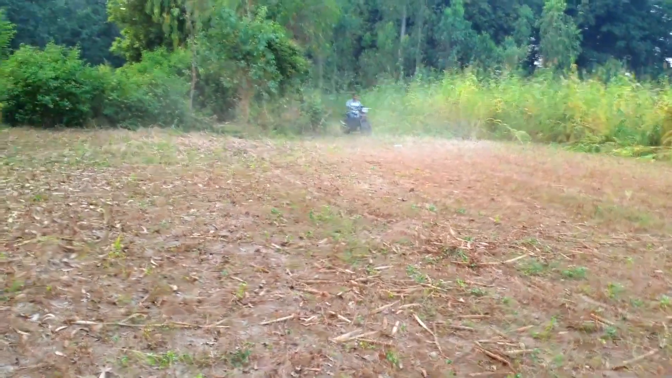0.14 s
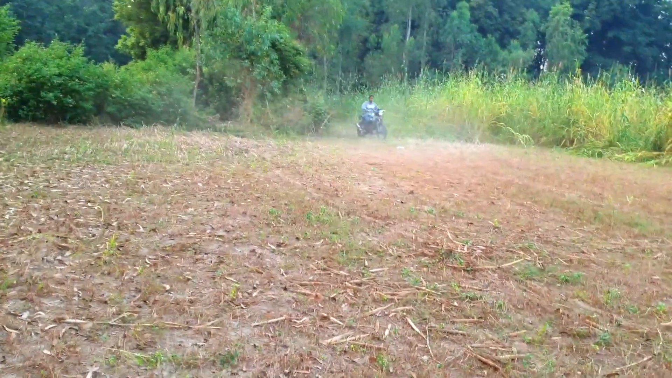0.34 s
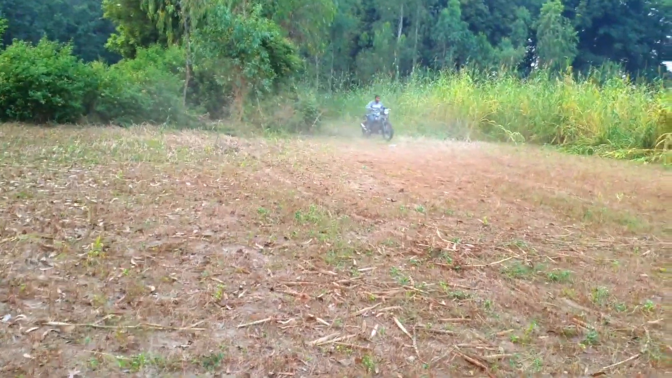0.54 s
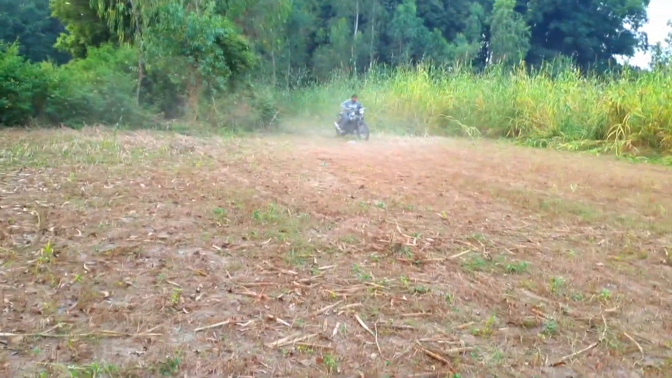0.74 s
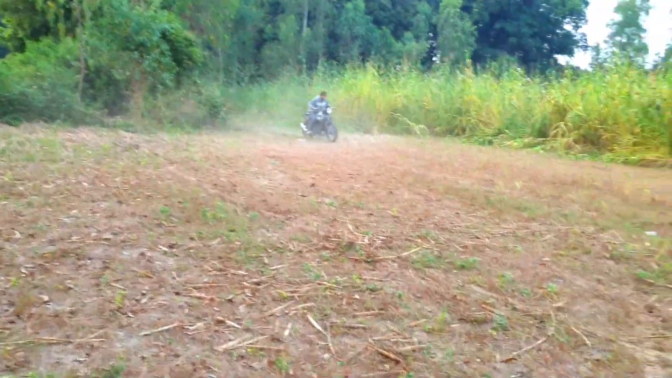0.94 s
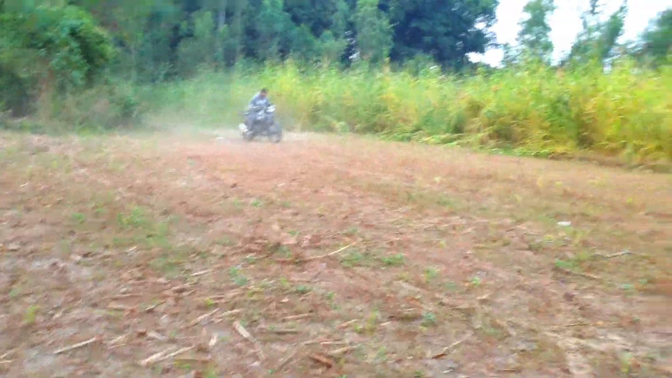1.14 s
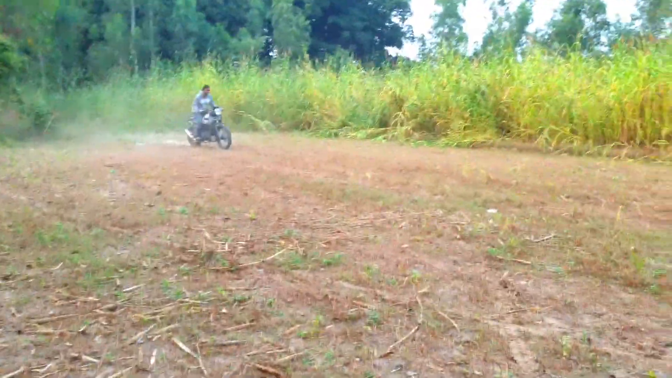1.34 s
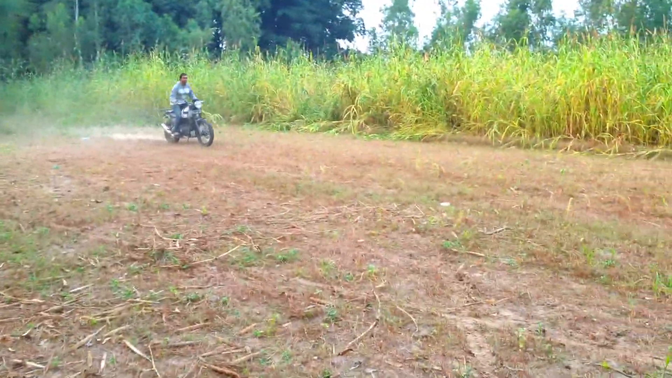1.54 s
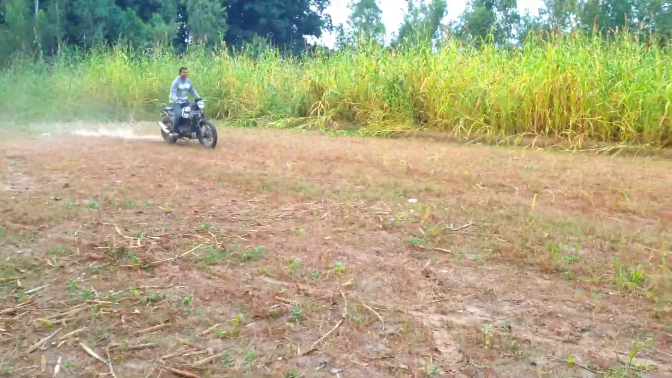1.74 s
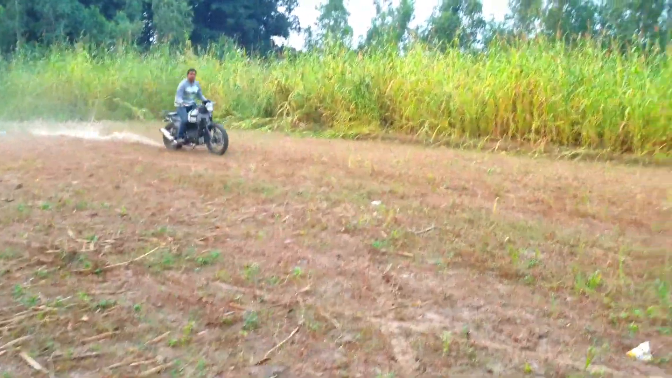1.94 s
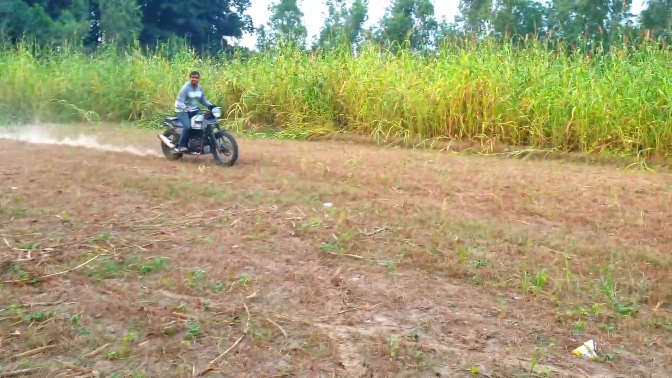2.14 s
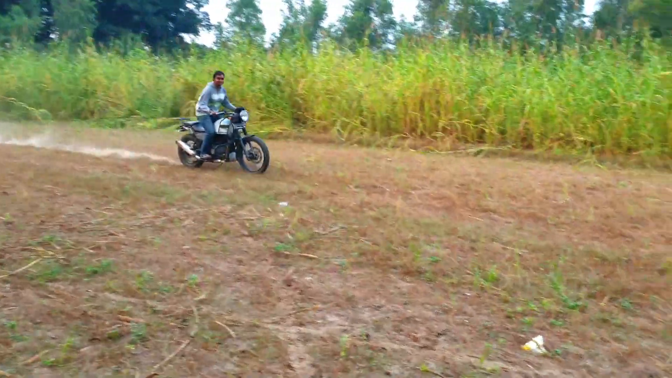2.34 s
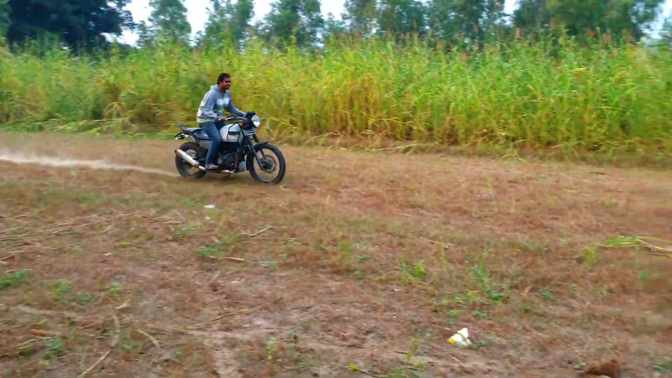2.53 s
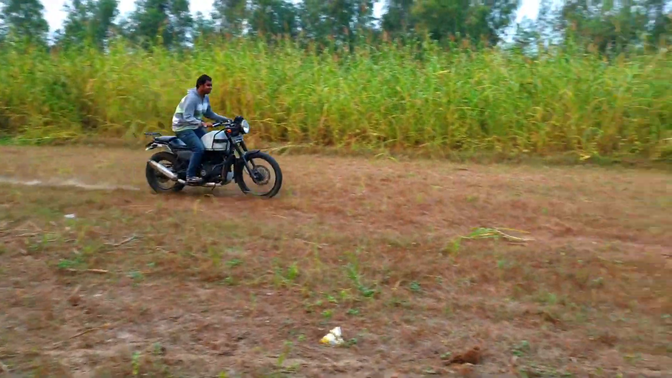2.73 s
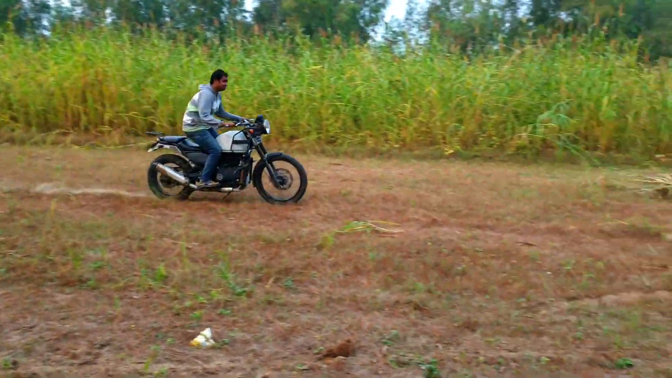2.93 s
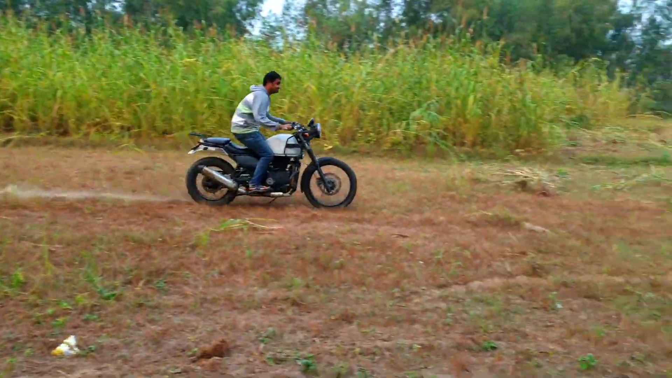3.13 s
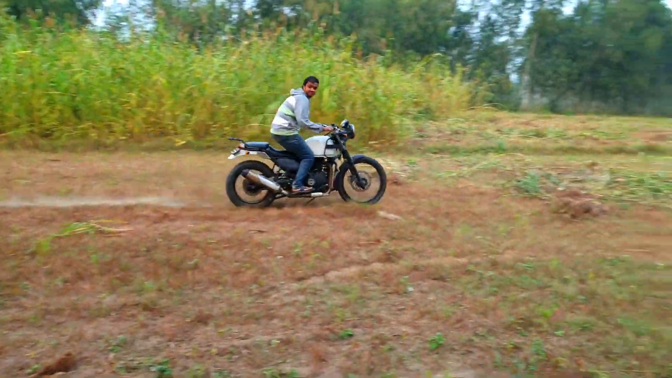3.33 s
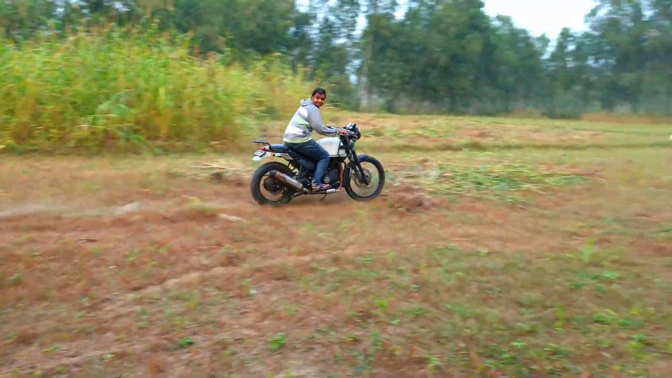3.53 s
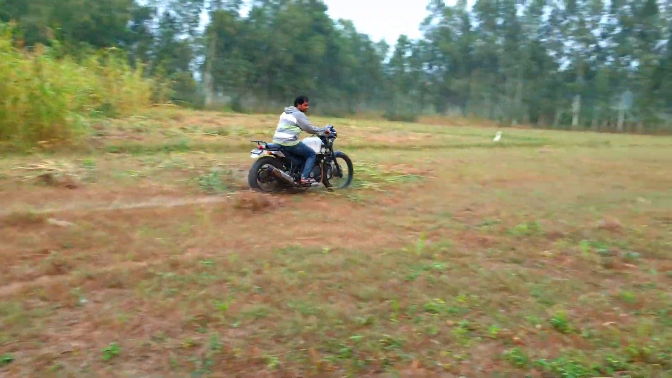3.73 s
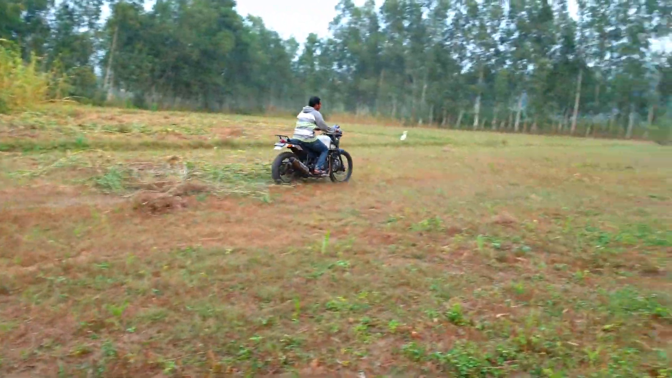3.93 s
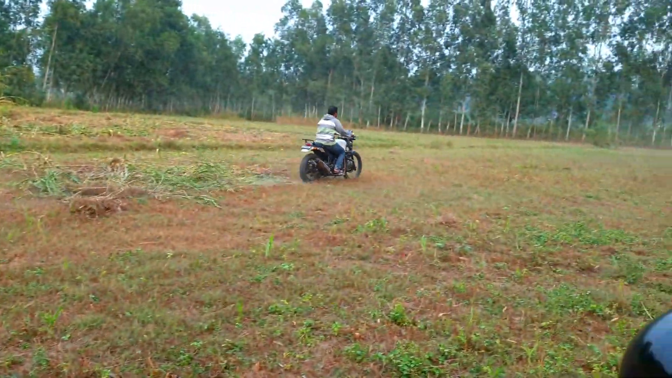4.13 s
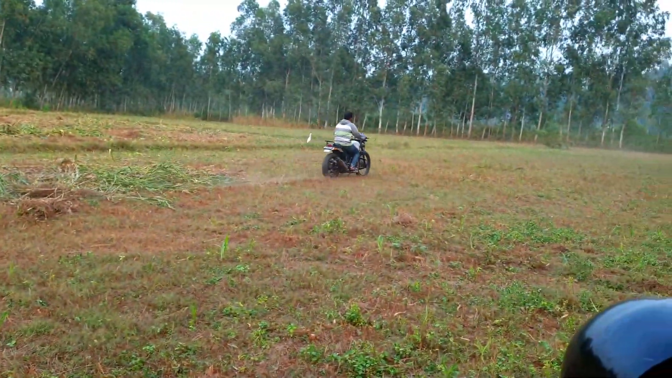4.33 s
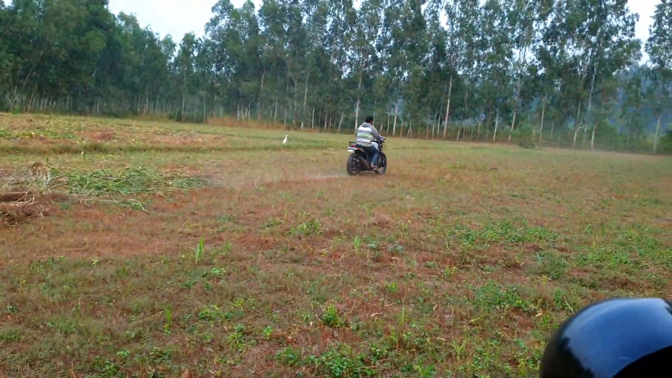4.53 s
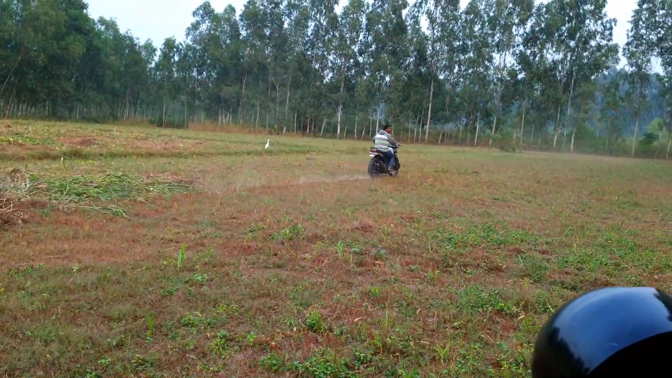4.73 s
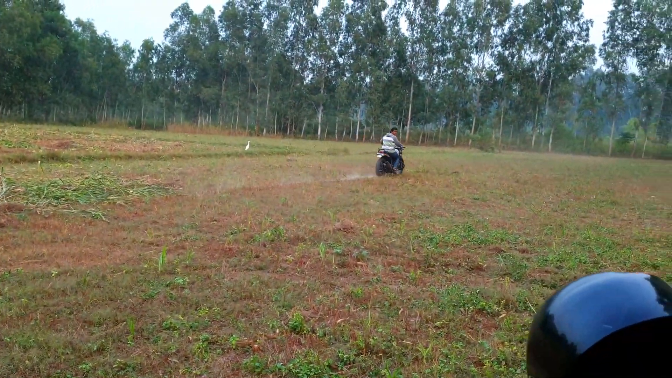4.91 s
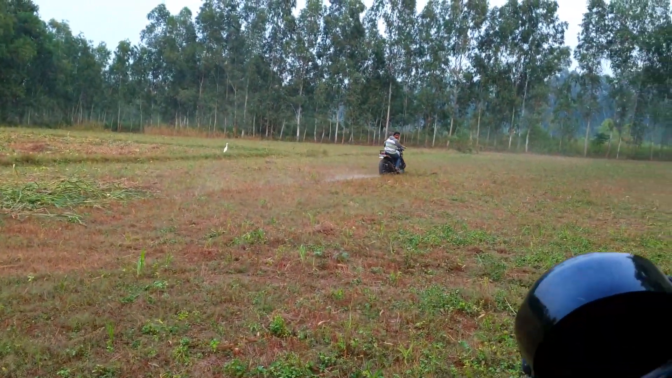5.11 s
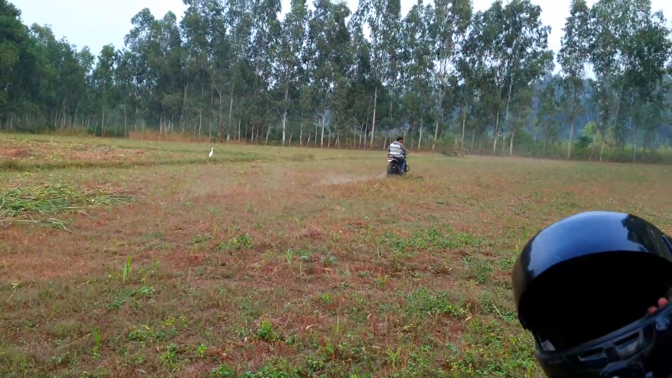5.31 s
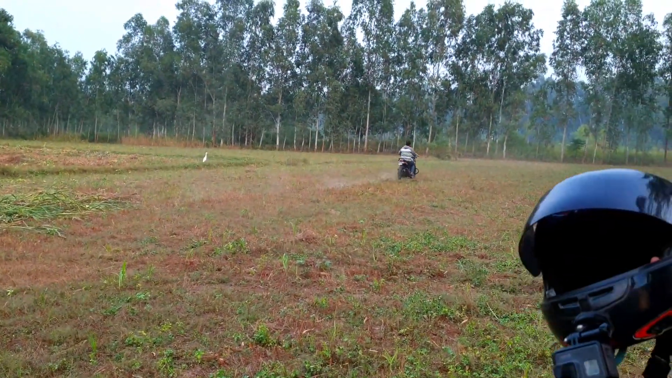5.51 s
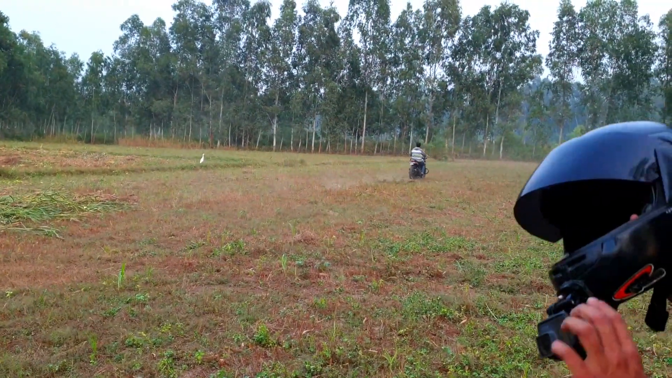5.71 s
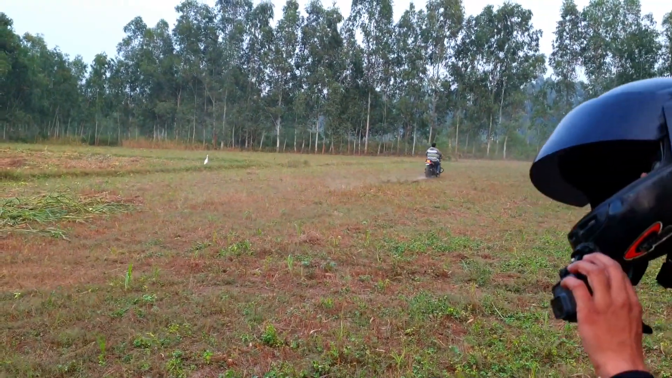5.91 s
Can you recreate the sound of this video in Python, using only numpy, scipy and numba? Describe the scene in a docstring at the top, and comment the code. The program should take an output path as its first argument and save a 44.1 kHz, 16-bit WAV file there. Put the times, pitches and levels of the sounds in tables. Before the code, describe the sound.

In an open dry field, a single-cylinder motorcycle starts far off at a slow, quiet thump, then accelerates towards the microphone with rising pitch, clattering valves and crackling stubble. It passes about seven metres away in a growling exhaust bark, the throttle closes with a brief burble, and it recedes, slowing, with loose metallic chinks and one sharp pop. Handheld stereo microphone, lopsided until the pass, then centred.

```python
"""First a motorcycle idles to the fore; it pulls away over a dry field, passes about 7 m off and eases away.
Each firing of its single four-stroke cylinder rings the silencer and puffs gas; the intake gulps and honks.
Random knocks at repeating crank angles make the valve clatter; random cracks make the stubble under the tyres.
Close to the pass the two-port stereo image snaps from lopsided (bass right, hiss left) to centred.
A pop, loose metal and jolts from the ground stand out over rolling rumble and faint open air."""
import sys
import numpy as np
from scipy import signal
from scipy.fft import rfft, irfft, next_fast_len
from scipy.io import wavfile
from scipy.ndimage import uniform_filter1d, map_coordinates
from numba import njit

SR = 44100
rng = np.random.default_rng(int(sys.argv[2]) if len(sys.argv) > 2 else 0)


def generate_wav(sig):
    """Save sig (samples, or channels by samples) to the path in sys.argv[1] as 16-bit PCM at SR."""
    pcm = np.round(np.clip(np.atleast_2d(sig).T, -1, 1) * 32767).astype(np.int16)
    wavfile.write(sys.argv[1], SR, pcm)


N = 267141
TIME = np.arange(N) / SR

# two weak firings, a brief burble as the throttle eases: (time [s], level [dB])
WEAK_FIRINGS = [(3.724, -6), (3.76, -8)]
# pipe resonances at 45 firings per second: (centre [Hz], width [Hz], level [dB])
TAILPIPE_MODES = [(217, 1400, -2), (265, 96, 5.5), (319.4, 9.9, 4), (372.5, 58, 1.5)]
# growl of the tailpipe's mouth as it points at the listener: (time [s], level [dB])
GROWL_LEVEL = [(2.7, -66), (3.05, -40), (3.2, -20), (3.42, -22.5), (3.64, -36), (3.8, -70), (4.2, -80)]
# air box, then intake duct: (centre [Hz], width [Hz])
INTAKE_MODES = [(46, 13.6), (156, 370)]
# the rider's hand: (time [s], throttle opening [0-1])
THROTTLE_OPENING = [(0, .62), (.4, 0.41), (.55, 0.65), (.68, 0.89), (.8, 0.79), (1.17, 1), (1.55, 0.98),
                    (2.1, 0.86), (2.3, 1), (3.63, 0.93), (3.8, 0.62)]


def exhaust_note(cycle, rate_hz, rear, boom_db, bark_db, gulp_db):
    """Each blowdown rings the silencer; a third of a cycle later the intake sucks on the air box."""
    fired = np.interp(np.arange(1, int(cycle[-1]) + 1), cycle, TIME) - .00333
    size_chance, time_chance = rng.standard_normal((len(fired), 2)).T
    size_db = .5 * size_chance + sum(db * (abs(fired - s) < .01) for s, db in WEAK_FIRINGS)
    pulses = clicks(fired + .00005 * time_chance, undb(size_db))

    # the boom sits a little lower the faster the engine runs
    boom = swept(pulses, 115.2 * (45 / rate_hz) ** 0.18, 20.0)
    # faster running heats the gas, which raises the pipe's resonances
    heat = (rate_hz / 45) ** 0.24
    bark = sum(undb(db) * swept(pulses, hz * heat, float(width)) for hz, width, db in TAILPIPE_MODES)
    bark = lowpass(resonance(bark, hz=323, width_hz=1030), hz=435, order=6)

    # one long-ringing resonance takes over a little from the broad bark
    growl_gain = undb(curves(GROWL_LEVEL)[0])
    growl = steady(resonance(bark, hz=317.6, width_hz=40)) * growl_gain
    bark = steady(colour(bark, [(290, 2.0), (365, 1.0), (440, -10), (520, 13.5)]))
    bark = bark * (1 - 0.13 * growl_gain / growl_gain.max())

    # the suction follows at a fixed crank angle plus its travel through the duct
    suction = -window(cycle - 0.0011 * rate_hz, centre=0.33, width=0.038)
    # slow cycles leave the small duct time to ring; at speed the big air box takes over
    (box_hz, box_width), (duct_hz, duct_width) = INTAKE_MODES
    duct_gain = (30 / rate_hz) ** 2 * undb(-19.5)
    gulp = resonance(suction, box_hz, box_width) + duct_gain * resonance(suction, duct_hz, duct_width)

    # the intake valve opens with a jolt once a cycle, and the snorkel honks forwards
    opened = np.interp(np.arange(int(cycle[-1])) + 0.102, cycle, TIME)
    honk = clicks(opened, np.ones(len(opened)))
    for _ in range(2):
        honk = resonance(honk, hz=419, width_hz=92)
    honk_gain = undb(gulp_db - 12) * (1 - rear) * curves(THROTTLE_OPENING)[0] ** 2

    note = steady(boom) * undb(boom_db) + bark * undb(bark_db + 1.0) + steady(gulp) * undb(gulp_db + 1.5)
    note = note + growl + steady(honk) * honk_gain
    # small openings radiate little deep bass, and the packing absorbs the top
    return colour(note, [(22, -38), (45, -18.0), (65, 1.5), (400, -2), (500, -20.0), (900, -16)])


# colours of the noisy parts, each: (frequency [Hz], gain [dB])
RASP_COLOUR = [(15, -36), (35, -4), (150, -2), (300, 4), (490, -6), (620, -3), (820, -1), (1020, -1.5),
               (1400, 2), (1700, 0.5), (2100, -27), (4000, -27)]
# engine case
CASE_COLOUR = [(1200, -41), (1780, 5), (1930, 11), (2020, 7), (2150, 12.5), (2300, 8), (2480, 8),
               (2650, 10), (2790, 10.5), (2950, 8.5), (3300, -2), (3900, -1.5), (5000, -22)]
# metal clatter
CLATTER_COLOUR = [(2200, -65), (3300, 3.5), (4100, 2), (4800, 2), (5800, 1.5), (6800, 4.5), (7500, -2.5),
                  (8100, -11.5), (11000, -61)]
# valve ticks
TICK_COLOUR = [(6000, -69), (8000, 5), (9100, 11), (10800, 4.5), (12000, 1), (13200, -14), (16000, -23.5)]
# gas hissing through the tailpipe
PUFF_COLOUR = [(200, -44), (600, -17.5), (1500, -13.5), (1820, -9), (2020, -10.5), (2230, 0), (2480, -0.5),
               (2750, -7.5), (3300, -14), (4000, -10), (4950, -13), (5700, -10), (6400, -17), (9000, -52)]


def engine_noise(cycle, rear, rasp_db, ring_db, clatter_db, tick_db):
    """Metal clatter dominates from the front, puffs of exhaust gas from behind."""
    gas = rng.standard_normal((5, N))
    # no two blowdowns or valve closings are equally strong
    force_per_cycle = undb(2 * rng.standard_normal((int(cycle[-1]) + 2, 2)))
    blow_force, valve_force = force_per_cycle[(cycle + .5).astype(int)].T
    blowdown = blow_force * window(cycle, centre=-0.078, width=0.029)
    outflow = window(cycle, centre=0.08, width=0.26)
    valves = valve_force * window(cycle, centre=-0.21, width=0.038)
    front = np.sqrt(np.clip(1 - rear ** 2, .01, 1))

    rasp = 0.96 * valve_gear(cycle, count=40, scatter_db=2.5, slop_s=.00003)
    rasp = rasp + gas[0] * (0.5 + rear * (blowdown + 0.38 * outflow))
    case = 0.92 * valve_gear(cycle, count=48, scatter_db=3.0, slop_s=.000015)
    case = case + gas[1] * (1.1 + 0.18 * rear * blowdown)
    clatter = 1.9 * valve_gear(cycle, count=90, scatter_db=3.0, slop_s=.000015)
    clatter = clatter + gas[2] * (1.65 + 0.21 * outflow + rear * (blowdown + .5 * outflow))

    # the metal is loudest as the exhaust valve opens and while the gas flows, and rests during the intake
    load = 1 + 0.4 * valves + 0.4 * outflow
    case, clatter = case * load, clatter * load
    # the valves stand out only from the front
    valve_share = 4.1 * np.clip(1 - 4.0 * rear, 0, 1)
    tick = gas[3] * (1 + valve_share * valves + .5 * outflow + 2.4 * rear * blowdown)

    # gas hisses through the tailpipe, and each blowdown strikes its metal with a short chink
    flow = gas[4] + 1.2 * valve_gear(cycle, count=120, scatter_db=2.0, slop_s=.00001)
    jet = flow * (1 + blowdown + 0.058 * outflow)
    jet = steady(colour(spread(jet, width=0.088), PUFF_COLOUR))
    chink = shell_ring(cycle, scatter_db=4.5, buzz=0.014)

    rasp = steady(colour(spread(rasp, width=0.61), RASP_COLOUR))
    case = steady(colour(spread(case, width=0.45), CASE_COLOUR))
    clatter = steady(colour(spread(clatter, width=1.0), CLATTER_COLOUR))
    tick = steady(colour(spread(tick, width=16.0), TICK_COLOUR))
    return (rasp * undb(rasp_db + 1.73)
            + case * undb(ring_db + 1.45) * front
            + (jet * undb(1.5) + chink * undb(-3.5)) * undb(ring_db) * rear
            + clatter * undb(clatter_db - 3.0) * np.sqrt(front)
            + tick * undb(tick_db - 1.0))


def valve_gear(cycle, count, scatter_db, slop_s):
    """Knocks near the same crank angles in every cycle; strengths drift over a few cycles and scatter in each."""
    angles = (np.arange(count) + rng.random(count)) / count
    turns = np.arange(int(cycle[-1]) + 1)[:, None] + angles
    times = np.interp(turns, cycle, TIME) + slop_s * rng.standard_normal(turns.shape)
    drift = np.tanh(4 * uniform_filter1d(rng.standard_normal(turns.shape), size=13, axis=0))
    return steady(clicks(times, drift * undb(scatter_db * rng.standard_normal(turns.shape))))


# ringing of the silencer's metal shell: (centre [Hz], width [Hz], level [dB])
SHELL_MODES = [(1590, 11, 7), (1890, 14, 18), (2240, 89, 11), (2450, 82, -11), (4790, 88, -1),
               (5940, 95, 4.5), (6560, 250, -16)]


def shell_ring(cycle, scatter_db, buzz):
    """Each blowdown strikes the silencer's shell once; gas noise keeps it buzzing faintly."""
    turns = np.arange(1, int(cycle[-1]) + 1)
    size_chance, time_chance = rng.standard_normal((len(turns), 2)).T
    struck = np.interp(turns - 0.12, cycle, TIME) + 0.000175 * time_chance
    blows = clicks(struck, undb(scatter_db * size_chance))
    gas = rng.standard_normal((2, N)) * buzz * (0.74 + window(cycle, centre=-0.032, width=0.1))
    drive = blows + gas
    return steady(sum(undb(db) * resonance(drive, hz, width) for hz, width, db in SHELL_MODES))


# colour of the pop's crack: (frequency [Hz], gain [dB])
CRACK_COLOUR = [(300, -12), (700, -7), (1000, -21), (1350, -2), (1900, -1), (2200, -5), (3600, -4),
                (4200, -24), (8000, -24), (14000, -40)]
POP_S, POP_THUMP_S, POP_THUMP_DB, POP_CRACK_DB = 5.465, 0.0014, -17, -15


def pop():
    """Unburnt fuel goes off in the pipe: one short pressure swing with a sharp crack on it."""
    age = (TIME - POP_S - 0.0011) / POP_THUMP_S
    thump = (age ** 2 - 1) * np.exp(-.5 * age ** 2)
    after_s = np.maximum(TIME - POP_S, 0)
    spit = 0.16 * rng.standard_normal(N) * (after_s > 0) * np.exp(-after_s / 0.0025)
    crack = colour(clicks([POP_S], [1]) + spit, CRACK_COLOUR)
    return thump * undb(POP_THUMP_DB) + crack / abs(crack).max() * undb(POP_CRACK_DB)


# rough ground and a brief metallic ring:
# (time [s], peak level [dB], centre [Hz], width of each resonance pass [Hz], decay [s])
GROUND_KNOCKS = [(0.168, -27, 6860, 7990, 0.00083), (2.78, -14, 5500, 7000, 0.0018),
                 (2.785, -16, 780, 646, 0.0092), (2.964, -18.5, 2836, 67, 0.095),
                 (4.172, -26, 591.5, 390, 0.0094)]
# loose metal chinking on the silencer: (time [s], relative level [dB])
LOOSE_METAL = [(4.5915, -22), (4.6865, -28), (4.711, -27), (4.736, -34), (4.76, -24), (4.8084, -25),
               (4.8318, -26), (4.9045, -26), (4.9296, -27), (4.9536, -26), (5.0522, -28), (5.0776, -31),
               (5.1275, -24), (5.153, -25), (5.2298, -25), (5.3061, -22), (5.3837, -27), (5.4358, -34),
               (5.57, -25), (5.5974, -29), (5.6513, -29), (5.792, -34), (5.9631, -30), (6.023, -33)]
# valve ticks that stand out on the approach: (time [s], relative level [dB], ring [Hz])
STRONG_TICKS = [(0.8896, -26, 9860), (1.371, -24, 9010), (1.4938, -15, 10200), (1.5177, -16, 8700),
                (1.5412, -17, 8930), (1.6555, -18, 9170), (1.6988, -16, 9280), (1.7866, -21, 9030),
                (1.832, -17, 8870), (1.8971, -15, 9140), (1.9388, -17, 10200), (1.9597, -19, 9210),
                (1.9822, -18, 10300), (2.0026, -22, 9170), (2.1119, -17, 9260), (2.1338, -18, 10200)]


def knocks():
    """Jolts from the ground, the loose metal and the loudest valve ticks, each a ringing puff of noise."""
    jolts = sum(burst(*row) for row in GROUND_KNOCKS)
    chinks = sum(burst(s, db, hz=2380, width_hz=480, decay_s=0.0004) for s, db in LOOSE_METAL)
    ticks = sum(burst(s, db, hz, width_hz=3000, decay_s=0.0006) for s, db, hz in STRONG_TICKS)
    return jolts + chinks * undb(-0.5) + ticks * undb(-2.5)


def burst(s, db, hz, width_hz, decay_s):
    """A puff of noise that dies away at once, ringing one steep resonance."""
    start = int(s * SR)
    age = TIME[:SR // 4]
    ring = rng.standard_normal(len(age)) * np.exp(-age / decay_s)
    # twice through, for steeper sides
    ring = resonance(resonance(ring, hz, width_hz), hz, width_hz)
    return np.pad(undb(db) * ring / abs(ring).max(), (start, N))[:N]


def stubble(treble_db, per_second, db):
    """Dry stalks snap under the tyres: many small cracks, a few large."""
    when, size = rng.random((int(per_second * N / SR), 2)).T
    cracks = clicks(when * N / SR, 1 / np.sqrt(size + .02))
    cracks = colour(spread(cracks, width=1.0), [(500, -35), (2000, -20), (7000, 10), (15000, -1.5)])
    return cracks / cracks.std() * undb(treble_db + db)


def low_rumble(rasp_db):
    """Turbulence and rolling tyres fill the valleys between the engine's lines, over faint open air."""
    rolling = spread(rng.standard_normal(N), width=0.99)
    rolling = steady(colour(rolling, [(20, -34), (60, -21), (300, -7), (550, -17), (1000, -31.0)]))
    air = rng.standard_normal((2, N))
    air = steady(colour(air, [(20, 5), (100, 3.0), (500, -15.5), (4000, -9.5), (15000, -28)]))
    return rolling * undb(rasp_db - 13.0) + air * undb(-47.5)


# relative level of each part before its trim in the mix: (base at the nearest point on full throttle [dB],
# loss per doubling of distance [dB], throttle shut [dB], from behind [dB], in the pipe's beam [dB])
PART_LEVELS = { "bark": (-23.5, 7.5, -17, -4, 1.1), "rasp": (-21.5, 10, -16.5, -12.5, 5.5),
               "ring": (-25, 9.5, -13.5, -2, 1), "clatter": (-22.5, 7.5, -16.5, -4, 6)}
# a straight line past the microphone
SPEED_M_S, PASSES_S, NEAREST_M = 7.2, 3.377, 6.93
# the tailpipe points back and a little outwards: its beam sweeps the listener just after the pass
REAR_FOCUS, BEAM_AT_M, BEAM_WIDTH_M = 1.25, 1.6, 3.35


def ride():
    """Distance, throttle and the way the tailpipe points set the level of the parts in the table."""
    along_m = SPEED_M_S * (TIME - PASSES_S)
    distance_m = np.hypot(along_m, NEAREST_M)
    # near 0 when heard from ahead of the bike, near 1 from behind
    rear = ((1 + along_m / distance_m) / 2) ** REAR_FOCUS
    beam = np.exp(-((along_m - BEAM_AT_M) / BEAM_WIDTH_M) ** 2)
    doublings = np.log2(distance_m / NEAREST_M)
    shut = 1 - np.clip(curves(THROTTLE_OPENING)[0], 0, 1)
    levels_db = {}
    for part, (db, fall_db, shut_db, rear_db, beam_db) in PART_LEVELS.items():
        levels_db[part] = db - fall_db * doublings + shut_db * shut + rear_db * rear + beam_db * beam
    return rear, levels_db


# reflections shift as the listener turns to follow the bike:
# (time [s], delay off the hand [ms], delay off the body [ms])
CLOSE_REFLECTIONS = [(0.7, .87, 1.52), (1.35, .72, 1.41), (1.9, .84, 1.47), (2.9, .67, 1.3),
                     (4.2, .61, 1.33), (5.2, .61, 1.31), (6.06, .64, 1.2)]


def reflected(x, hand_db, body_db):
    """Two close, moving reflections at the microphone comb the hiss into sliding bands."""
    def delayed(ms):
        at = (TIME - ms / 1000) * SR
        return np.array([map_coordinates(port, [at], order=3) for port in x])

    hand, body = [delayed(ms) for ms in curves(CLOSE_REFLECTIONS)]
    heard = x - undb(hand_db) * hand + undb(body_db) * body
    return heard / np.sqrt(1 + undb(hand_db) ** 2 + undb(body_db) ** 2)


def undb(db):
    """Decibels to gain."""
    return 10 ** (np.asarray(db) / 20)


def curves(rows):
    """The columns of a table, joined by straight lines in time."""
    s, *columns = np.transpose(rows)
    return [np.interp(TIME, s, c) for c in columns]


def steady(x):
    """Scale a sound to a running rms of 1, keeping the beat of single firings."""
    power = uniform_filter1d(uniform_filter1d(x ** 2, size=5800), size=3900)
    return x / np.sqrt(np.atleast_2d(power).mean(axis=0) + 1e-14)


def resonance(x, hz, width_hz):
    """One resonance with gain 1 at its centre."""
    return signal.lfilter(*signal.iirpeak(hz, hz / width_hz, fs=SR), x)


@njit
def swept(x, hz, width_hz):
    """A resonance whose centre moves, gain 1 at the centre (state-variable filter)."""
    y, band, low = np.empty(len(x)), 0., 0.
    for i in range(len(x)):
        g, k = np.tan(np.pi * hz[i] / SR), width_hz / hz[i]
        v = (band + g * (x[i] + 1e-18 - low)) / (1 + g * (g + k))
        band, low, y[i] = 2 * v - band, low + 2 * g * v, k * v
    return y


def lowpass(x, hz, order):
    """Butterworth low-pass."""
    return signal.sosfilt(signal.butter(order, hz, fs=SR, output="sos"), x)


def colour(x, points):
    """Filter by (frequency [Hz], gain [dB]) points on a log-frequency axis."""
    size = next_fast_len(N + 4096)
    hz, db = np.transpose(points)
    bins = np.maximum(np.arange(size // 2 + 1) * SR / size, 1)
    gain = undb(np.interp(np.log(bins), np.log(hz), db))
    return irfft(rfft(x, size) * gain, size)[..., :N]


def clicks(times, sizes):
    """Impulses at the given times, each shared between two samples."""
    at = np.ravel(times) * SR
    keep = (at > 0) & (at < N - 2)
    at, sizes = at[keep], np.ravel(sizes)[keep]
    whole = at.astype(int)
    part = at - whole
    return np.bincount(whole, sizes * (1 - part), N) + np.bincount(whole + 1, sizes * part, N)


def window(cycle, centre, width):
    """A smooth gate that opens once in each engine cycle; centre and width in cycles."""
    offset = (cycle - centre + .5) % 1 - .5
    return np.exp(-.5 * (offset / width) ** 2)


def spread(x, width):
    """Two ports hear the same sound plus unlike scatter from the ground, which follows its envelope."""
    envelope = np.sqrt(np.maximum(uniform_filter1d(x ** 2, size=60), 0))
    return x + width * envelope * rng.standard_normal((2, N))


def phase_shift(x, points):
    """Advance the phase by (frequency [Hz], lead [rad]) points."""
    bins = np.arange(N // 2 + 1) * SR / N
    lead_rad = np.interp(bins, *np.transpose(points))
    return irfft(rfft(x) * np.exp(1j * lead_rad), N)


# engine speed: idle, pulling away, a brief hesitation, a long slowing: (time [s], firings per second [Hz])
FIRING_RATE = [(0.0, 22.05), (0.49, 23.39), (0.7, 26.66), (1.13, 31.25), (1.28, 38.12), (1.67, 44.94),
               (1.97, 46.75), (2.1, 45.64), (2.22, 49.77), (2.49, 52.83), (2.71, 52.92), (3.26, 57.58),
               (3.5, 56.16), (3.63, 58.09), (3.83, 48.63), (4.16, 44.5), (4.4, 44.53), (4.56, 42.6),
               (5.41, 38.27), (6.06, 33.26)]
# relative levels of the bass: (time [s], silencer boom [dB], intake gulp [dB])
BASS_LEVELS = [(0, -39, -36), (.45, -39, -32), (.7, -36, -30), (.9, -34, -31.5), (1.2, -39, -26),
               (1.33, -31, -28.5), (1.7, -30, -20), (2.1, -27.5, -20.5), (2.4, -24.5, -25.5),
               (2.85, -25.5, -23.5), (3.13, -20, -25), (3.17, -23, -28), (3.45, -24.5, -29),
               (3.65, -26, -24), (3.755, -27, -28), (3.82, -34.5, -44), (4.6, -36, -41), (5.3, -31, -47),
               (6.06, -30.5, -39)]
# relative level of the valve ticks and stubble: (time [s], level [dB])
TREBLE_LEVEL = [(0, -49.5), (.42, -64), (.68, -50.5), (1.3, -40.5), (2.7, -35), (3.66, -33), (3.79, -44),
                (3.98, -41), (4.4, -51), (4.7, -61), (5.25, -55.5), (6.06, -61.5)]
# the bike's bearing from the microphone: (time [s], lead of the left port [ms])
BEARING_LEAD = [(0, -0.052), (1.3, 0.13), (2.9, 0.11), (3.3, 0.089), (3.85, 0.082), (4.6, -0.026),
                (6.06, -0.07)]


def scene():
    """The engine cycle times the engine's layers; the bike's bearing sets which port hears it first."""
    rate_hz, = curves(FIRING_RATE)
    cycle = np.cumsum(rate_hz) / SR + .091
    rear, db = ride()
    boom_db, gulp_db = curves(BASS_LEVELS)
    treble_db, = curves(TREBLE_LEVEL)
    lead_ms, = curves(BEARING_LEAD)
    note = exhaust_note(cycle, rate_hz, rear, boom_db, db["bark"], gulp_db)
    noise = engine_noise(cycle, rear, db["rasp"], db["ring"], db["clatter"], treble_db)
    bike = note + reflected(noise, hand_db=-35.0, body_db=-20)
    ground = stubble(treble_db, per_second=290, db=-2.0)
    left, right = bike + ground + knocks() + pop() + low_rumble(db["rasp"])
    left_at = np.arange(N) + lead_ms * SR / 1000
    return np.array([map_coordinates(left, [left_at], order=3, mode="nearest"), right])


# port responses before and after the image snaps, each: (frequency [Hz], left gain [dB], right gain [dB])
LOPSIDED_PORTS = [(58, -11, 6), (154, -7.5, 9.5), (210, -9, 7), (312, -5.5, 5), (466, 2.5, 3.5),
                  (820, -0.2, 2.5), (1300, -1, -3), (2480, 6.5, 1), (3580, 5, 3.5), (6150, 13.5, 1),
                  (7450, 7.5, 0), (10250, 3, 8.5), (13200, 6, 9), (15500, -13, 6.5)]
# after the snap
CENTRED_PORTS = [(60, 0.11, -1.4), (344, 0.23, 0.5), (520, 0.17, -4), (850, 0.29, -0.5), (1490, 1.2, -3.5),
                 (2420, 1.2, -2), (4070, 1.25, -1.5), (7500, 4.7, -1), (8100, 0.36, 0.5), (15500, 0.71, 3)]
# in the midrange the left port runs ahead of the right: (frequency [Hz], lead [rad])
LEFT_PORT_LEAD = [(450, 0.036), (1000, 0.7), (1700, 0.65), (2400, 0.065)]
SNAP_S, TOP_HZ = 3.145, 15900


def record(dry):
    """Each microphone port has its own colour, which switches within a few milliseconds; the top is cut."""
    dry = [phase_shift(dry[0], LEFT_PORT_LEAD), dry[1]]

    def through(ports):
        ports = np.array(ports)
        return np.array([colour(dry[k], ports[:, [0, k + 1]]) for k in range(2)])

    before, after = through(LOPSIDED_PORTS), through(CENTRED_PORTS)
    snapped = np.clip((TIME - SNAP_S) / 0.0038 + .5, 0, 1)
    heard = np.clip(before + snapped * (after - before), -1, 1)
    return signal.sosfilt(signal.ellip(10, .2, 80, TOP_HZ, fs=SR, output="sos"), heard)


dry = scene()
out = record(dry)
generate_wav(out)
```